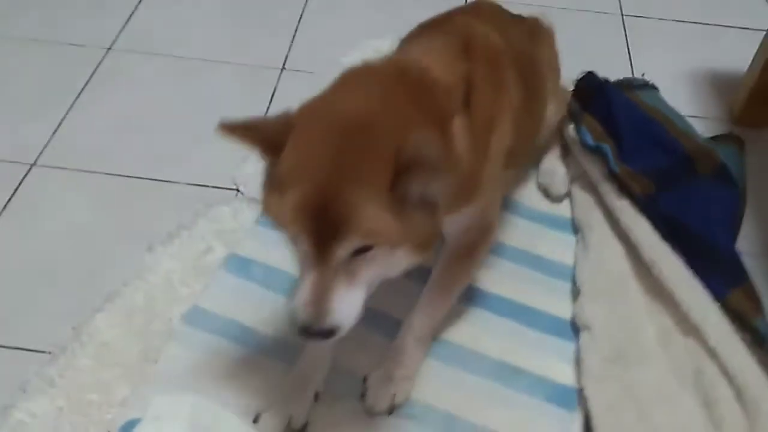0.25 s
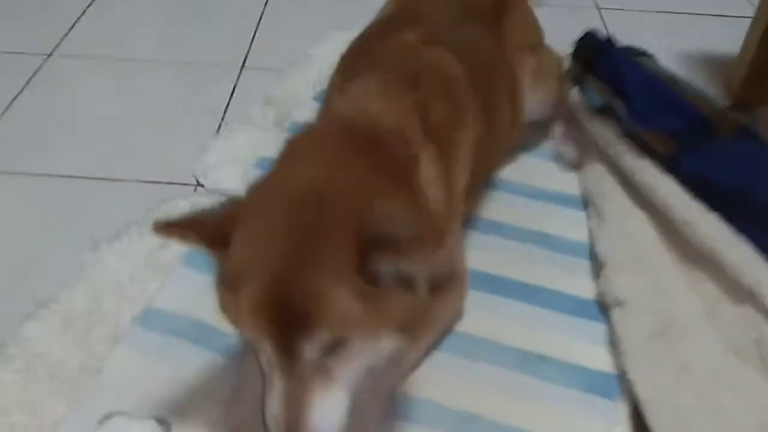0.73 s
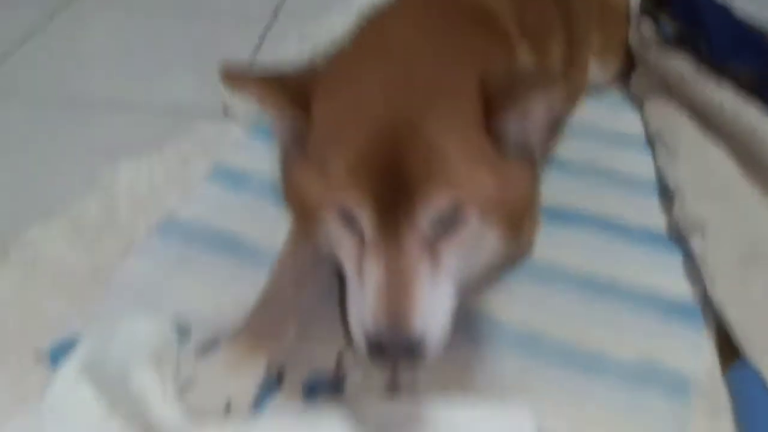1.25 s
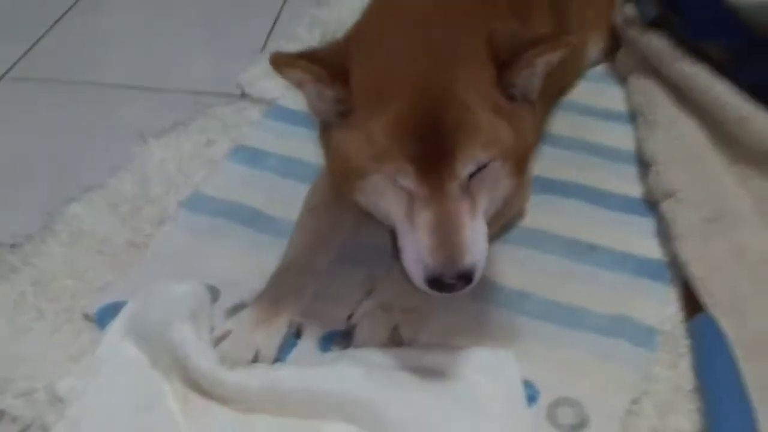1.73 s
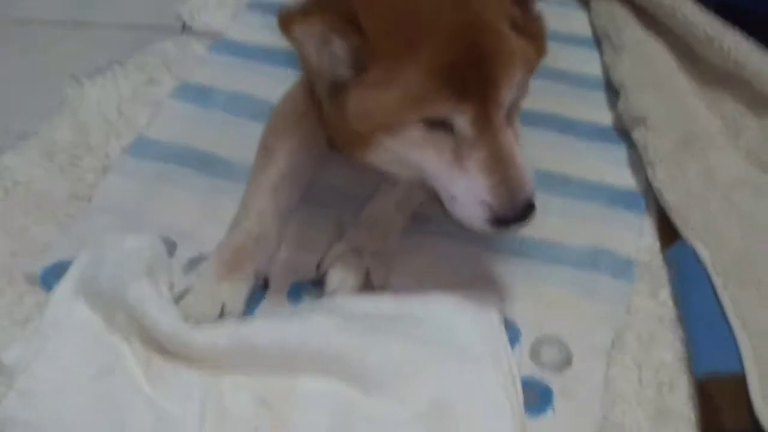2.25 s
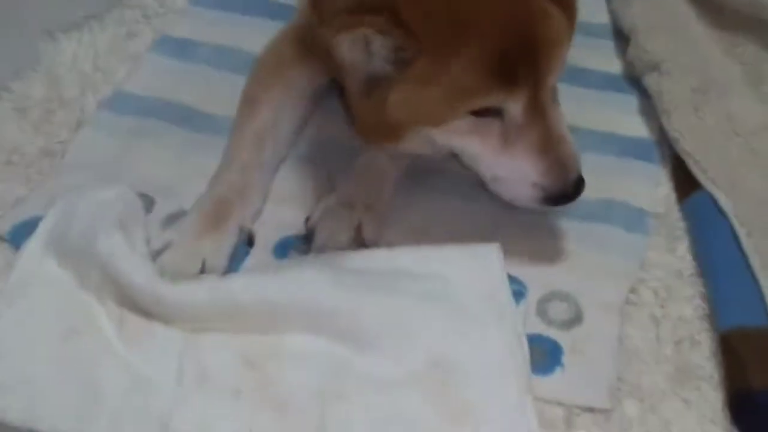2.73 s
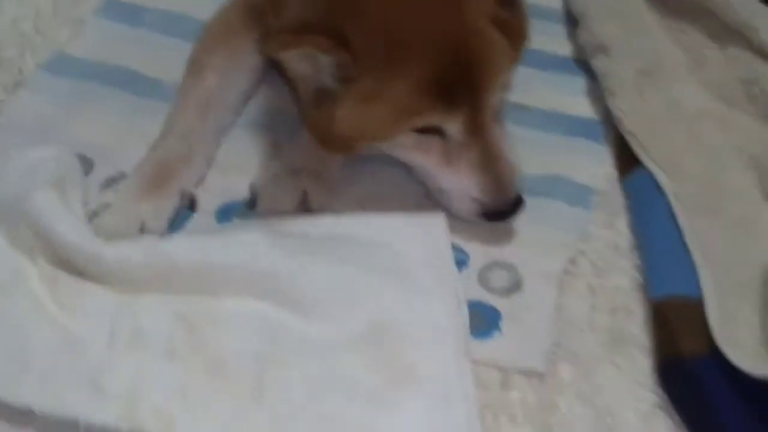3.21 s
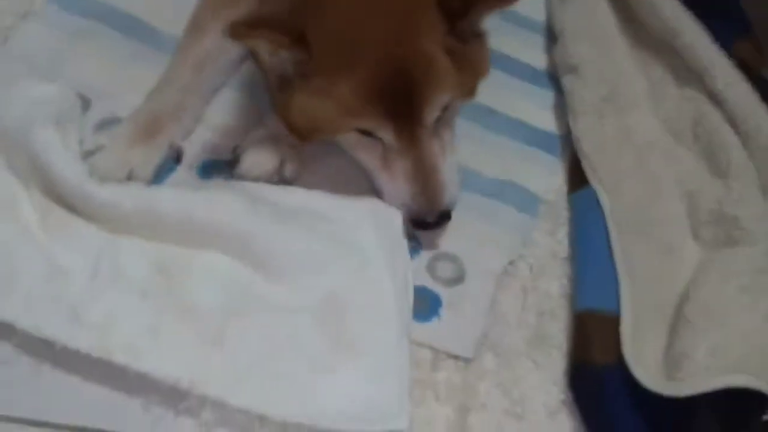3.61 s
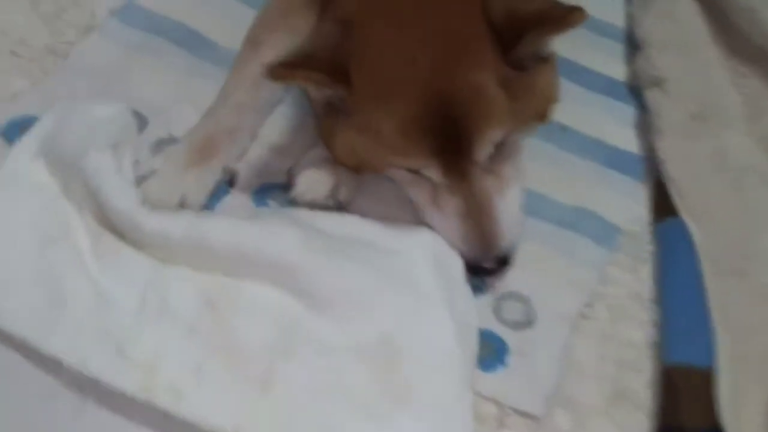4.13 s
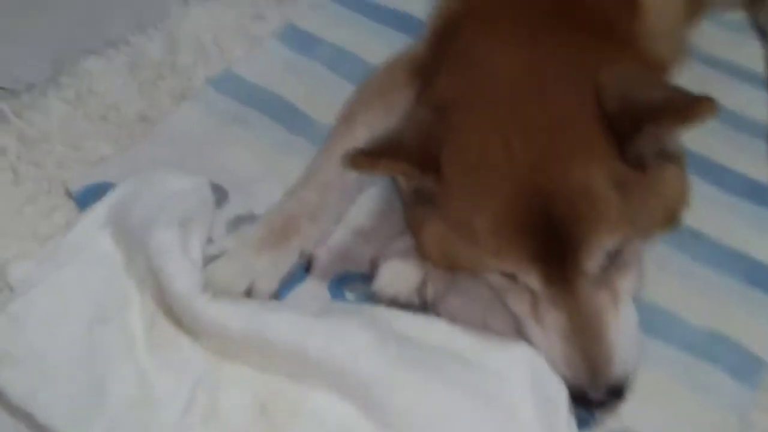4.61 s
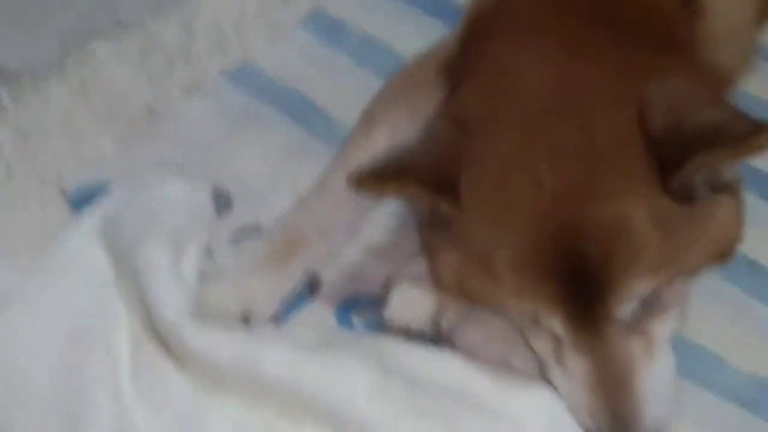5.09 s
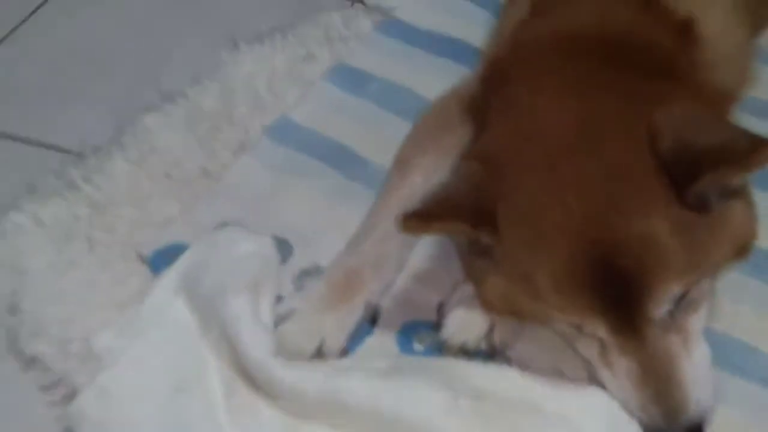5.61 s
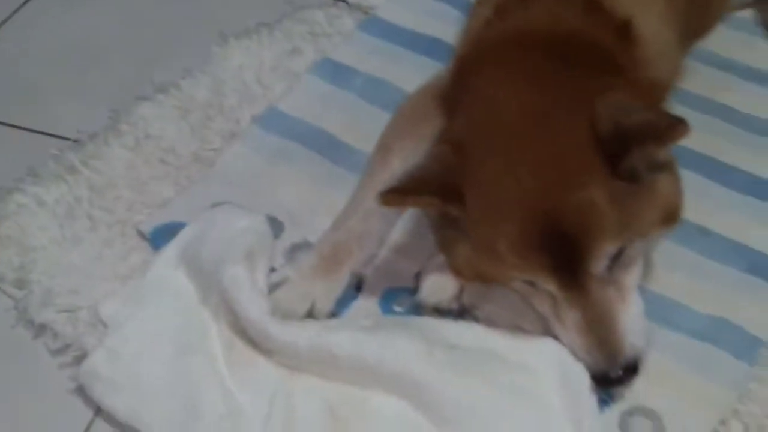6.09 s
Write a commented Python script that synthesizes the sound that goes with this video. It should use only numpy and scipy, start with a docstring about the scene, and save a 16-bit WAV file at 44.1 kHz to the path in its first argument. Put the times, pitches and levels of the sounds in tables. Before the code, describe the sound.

Close, hissy dog sniffs and gentle fabric rustling indoors, dotted with claw and tooth clicks, soft knocks and a single sharp crack.

```python
"""A dog noses at a towel

A dog settles on its bedding in a tiled room, close to a hand-held stereo microphone. Cloth rubs on
cloth, air hisses through the nose and a thin high hiss comes and goes, all made of swelling noise.
Claws and teeth click, the muzzle knocks softly, low bumps reach the microphone body,
and one loud snap rings in the room."""
import sys
import numpy as np
from scipy import signal
from scipy.fft import rfft, irfft
from scipy.io import wavfile

SR = 44100
rng = np.random.default_rng(int(sys.argv[2]) if len(sys.argv) > 2 else 0)


def wav_out(sig):
    """Save sig, one row per channel (or a flat mono array), as 16-bit PCM at SR to the path in sys.argv[1]."""
    wavfile.write(sys.argv[1], SR, np.round(np.clip(np.atleast_2d(sig).T, -1, 1) * 32767).astype(np.int16))


N = 280035

# The tone of the quiet room. Each row: pitch in Hz, relative strength in dB.
ROOM_TONE = [(15, -39), (25, -13), (77, 2.5), (445, -20), (666, -15), (2060, -23), (4150, -21.5),
             (4750, -31.5), (5140, -23), (8350, -24), (11200, -34.5), (14300, -36.5), (15500, -49.5)]
# The dull murmur of pressed bedding. Each row: time in seconds, level in dB.
MURMUR = [(0, -82.5), (1.8, -79.5), (1.95, -89), (2.35, -75.5), (3.17, -79), (3.62, -72.5), (4.06, -79),
          (4.75, -82), (5.9, -79), (6.35, -89.5)]
# Faint rustle between the events. Each row: time in seconds, base level in dB.
RUSTLE_LEVELS = [(0, -73.5), (.1, -76), (.47, -78), (.6, -70), (.8, -75), (1.3, -84), (1.6, -76),
                 (1.9, -101.5), (2.55, -95.5), (2.7, -79), (3.2, -77), (4.0, -81), (4.12, -91.5),
                 (4.85, -86), (5.1, -81.5), (5.9, -79.5), (6.28, -81), (6.35, -98)]

# A swell is a sound that rises, holds and falls. Each row of a swell table begins: start of the hold,
# hold time, time to rise 20 dB and time to fall 20 dB, all in seconds, then level, slide during the
# hold and pan, all in dB. Pan is how much louder the left side is than the right.
# Bedding pressed down hard. Each row: just a swell.
PRESS_SWELLS = [(.39, .01, 0.11, 0.25, -77, 0, -23), (.77, .1, .2, 0.82, -64.5, -7, -1),
                (1.1, .15, 0.06, 0.11, -69.5, 0, -2.5), (1.76, .01, 0.29, 0.077, -67, 0, 3),
                (4.22, 0.0077, 0.056, 0.084, -56, -1.5, -22), (4.6, .04, .1, 0.075, -72.5, 0.5, 0),
                (5.94, 0.0092, .04, 0.057, -60.5, 0, 0.5)]
# Cloth dragged on cloth. Each row: a swell, then dB added for its brighter part.
RUB_SWELLS = [(.36, .01, 0.14, 0.056, -67, -1, -1.5, -6), (.72, .3, 0.06, .1, -71.5, 12, 0, -18),
              (.77, .005, 0.074, 0.037, -58.5, 1, 8, -27), (1.04, 0.0079, 0.092, 0.15, -52.5, -7, -1, 3),
              (1.18, 0.021, 0.033, 0.089, -63.5, 0, 2, -14), (1.645, 0.013, 0.018, .04, -56.5, 2.5, -15, 3),
              (1.67, 0.12, 0.075, 0.12, -64, -4, -1.5, 1.5), (2.25, .005, 0.012, 0.067, -69, -2.5, 8, -10),
              (2.69, 0.37, .08, 0.065, -68.5, 1, -4.5, -6.5), (3.46, .02, 0.1, 0.14, -77, -4, -4, 7.5),
              (3.5, .11, 0.029, 0.062, -61.5, -1.5, 0.5, -10), (3.69, .12, 0.054, 0.087, -63.5, -2, 2, -18),
              (3.95, 0.0095, 0.13, 0.14, -71, 1.5, 0, -14.5), (4.22, .01, .03, 0.04, -50, -1, -12, 1),
              (4.68, .005, 0.018, 0.075, -75.5, 0, -16, -19), (5.07, .005, .2, 0.075, -74, 1.5, 9, -5),
              (5.245, .02, 0.033, 0.072, -65.5, -3, -24, -18),
              (5.425, 0.0054, 0.039, 0.12, -75.5, 4.5, 3.5, -1.5),
              (5.55, .065, 0.024, 0.052, -58, -2.5, -19.5, -14), (5.7, 0.0053, .04, 0.11, -77, 0, 4, -3.5),
              (5.93, 0.0092, 0.026, 0.054, -61, -1.5, -0.5, -20)]
# Broad scuffs close on the right. Each row: a swell, then brightness in dB per band upward.
SCUFF_SWELLS = [(2.3, 0.2, 0.053, .05, -82, -2, -8, -1), (3.04, 0.064, 0.027, 0.031, -51.5, -0.5, -28, 0.5),
                (4.15, 0.066, 0.017, .03, -50.5, -4.5, -23, 0.8),
                (4.3, 0.032, 0.083, 0.058, -48.5, 3.5, -31, 0),
                (4.355, 0.018, 0.034, 0.041, -44.5, 0.5, -39, 0),
                (4.4, .26, 0.022, .05, -55.5, -7.5, -18.5, 0.85),
                (5.13, 0.014, 0.17, 0.053, -65, -2.5, -15, -0.6)]
# Thin high hiss, mostly left. Each row: a swell, then dB added in the TOP band and in the NOSE band.
HISS_SWELLS = [(0., .36, .05, 0.056, -55.5, 0, 7, -12, -3.5),
               (.9, 0.24, 0.066, 0.083, -59, -6, 30, -15, -8),
               (1.4, 0.41, 0.028, 0.063, -59, 5.5, 16, -2, 1.5),
               (1.62, 0.21, .1, .05, -56, -7, -5.5, -9, -10),
               (2.245, .005, .01, 0.053, -81.5, 3, 4, 1.5, 4),
               (2.64, 0.36, 0.033, .08, -62, -6.5, 10, 2, 7.5),
               (3.3, 0.67, 0.21, 0.11, -56.5, 1.5, 1, 3, -19),
               (4.22, 0.051, 0.042, 0.077, -57.5, -3, -2, 0.5, 10),
               (4.468, .01, .004, 0.13, -63, -7, 17, 0, 8), (5.415, 0.022, .01, 0.075, -72, -2, 10, -1, -5),
               (5.58, 0.67, 0.097, 0.056, -50, -6, 20, -20, -18)]
# The rasp of a strong sniff. Each row: a swell, then dB added for its lower part.
RASP_SWELLS = [(.15, 0.06, .04, 0.094, -45.5, 2, -4, -3), (1.025, 0.0074, 0.053, 0.14, -52, -1.5, 1, -2),
               (1.65, 0.17, 0.059, 0.058, -58.5, -4.5, 0, -1.5),
               (3.315, .14, 0.076, .05, -57.5, 1, 7, -15.5), (3.465, 0.0082, .03, 0.1, -58, -8.5, 2, 6),
               (3.74, .01, 0.07, 0.096, -60, -5, 3, -4.5), (4.23, 0.024, 0.068, 0.069, -55, 3, -6, -5),
               (6.2, .05, 0.42, 0.069, -64.5, -2.5, 6, -28)]
# Air through the nose; the swell at 0.65 s is the snap's hissy tail.
# Each row: a swell, then dB added in the TOP band.
AIRY_SWELLS = [(.155, 0.2, 0.051, 0.064, -38, -10.5, -1, -9.5),
               (.65, 0.083, 0.037, 0.091, -48.5, -3.5, -2.5, -19),
               (.94, .15, 0.14, 0.13, -46.5, 4, -0.5, -12.5), (1.65, 0.15, 0.18, 0.066, -44, -3, 4, -16),
               (2.68, 0.4, .05, 0.059, -62.5, -8, 8, 2), (3.3, 0.2, 0.12, 0.13, -45, -2.5, -1, -10),
               (3.745, 0.021, 0.055, 0.077, -45, -2.5, 1.5, -3), (5.55, 0.28, 0.15, .1, -66, -4, -10.5, -4),
               (5.93, 0.32, 0.53, 0.065, -54, 0.5, 0.5, -18)]

# Seven bands of noise (ranges of pitch), from 400 Hz upward.
DULL_CLOTH, BRIGHT_CLOTH, LOW_RASP, HIGH_RASP, NOSE_BAND, TOP_BAND, HISS_BAND = range(7)
TOP_START_HZ, HISS_START_HZ, HISS_END_HZ = 9500, 11900, 15700
# The tone of the scuffs. Each entry: dB added in one of the seven bands.
SCUFF_BAND_DB = [-4.5, -3.5, -6.5, -4.5, 1.5, -12.5, -20.5]
# The tone of the rustle. Each entry: dB added in one of the seven bands.
RUSTLE_BAND_DB = [-4, -6, -3.5, 0.5, 8, -2.5, -8.5]
# Pitches that the nasal passages favour. Each row: pitch in Hz, width in Hz, relative strength in dB.
NASAL_PEAKS = [(6182, 2100, -2), (7220, 1100, 4), (8510, 1500, 0.5)]

# Low bumps on the microphone. Each row: start in seconds, peak in dB, pitch in Hz, pan in dB,
# rough length in seconds.
MIC_BUMPS = [(0.337, -53.5, 75.4, -16, 0.038), (0.654, -48, 73.4, 4, 0.033),
             (0.836, -56.5, 70.0, -1, 0.037), (1.081, -49, 57.3, 3, 0.031), (1.129, -54, 78.1, 2.5, 0.028),
             (1.584, -56, 74.6, 4, 0.038), (1.836, -62, 72, 9.5, 0.036), (2.043, -58, 80.7, 8, 0.033),
             (2.311, -51, 69.8, 8, 0.042), (2.389, -48, 75, 4.5, 0.055), (2.681, -59.5, 76, -16, 0.05),
             (2.906, -56.5, 87.5, 5, 0.05), (3.023, -52.5, 84, 7, 0.055), (3.116, -55, 72.5, 14, 0.052),
             (4.197, -45.5, 86, -35, 0.043), (4.595, -51.5, 87, 7.5, 0.042),
             (4.626, -55, 61.9, -6.5, 0.038), (5.285, -59, 78.1, 3.5, 0.032), (6.213, -60, 61.9, 12, 0.044)]
# Soft hollow knocks of the muzzle. Each row reads like a row of the bumps.
MUZZLE_KNOCKS = [(0.407, -42, 164, -26.5, 0.018), (0.766, -41.5, 493, -2, 0.0096),
                 (0.86, -52.5, 272, -2, 0.025), (1.177, -45.5, 515, 5, 0.049), (1.734, -49.5, 530, 3, 0.02),
                 (2.249, -57, 242, 7, 0.02), (2.475, -66, 151, 9, 0.015), (3.511, -58, 899, -6, 0.013),
                 (3.501, -47.5, 620, -1.5, 0.01), (3.521, -44.5, 630, -7, 0.011),
                 (3.584, -52, 720, -6, 0.032), (3.607, -45.5, 596, -4, 0.012),
                 (3.7, -55.5, 693, -1.5, 0.022), (3.944, -59, 586, 1, 0.019), (4.207, -31, 182, -32, 0.011),
                 (4.575, -55, 125, 5, 0.035), (4.63, -54, 120, 0, 0.028), (4.679, -52, 441, -19, 0.016),
                 (5.072, -50.5, 378, 4, 0.012), (5.562, -56.5, 423, -21, 0.017),
                 (5.604, -58, 466, -9, 0.023), (5.705, -47, 375, 9.5, 0.0095), (5.93, -57, 310, -6, 0.012),
                 (5.94, -56, 360, -5, 0.022)]
# Claws and teeth. Each row: start in seconds, peak of the bright part in dB, its centre in Hz,
# pan in dB, dB added for the dull part.
CLAW_TOOTH_CLICKS = [(.147, -37.5, 3900, -3, -33), (.7294, -59.5, 6100, -1.5, -11),
                     (1.384, -53, 8420, 14, -27), (1.45, -48.5, 8450, 18, -34.5),
                     (1.647, -36.5, 2290, -24, -0.5), (2.246, -53, 4490, 12, -1.5),
                     (2.9446, -31.5, 8550, -22, -16), (4.4431, -35, 4000, -16, -15),
                     (4.4666, -34, 8500, 14, -31), (4.7485, -44.5, 9500, -16, -33),
                     (5.072, -49.5, 3790, 15, -14), (5.4176, -51.5, 13400, -3.5, -24),
                     (5.5574, -44, 13600, 11, -22.5)]
# The snap's ringing tones. Each row: pitch in Hz, relative strength in dB, seconds to fade by 60 dB.
SNAP_TONES = [(1285.3, -20.5, .006), (1900, -16.5, 0.0094), (2510, -6.5, .006), (3590, 1.5, 0.008),
              (4360, -3, 0.0032), (5400, -5.5, 0.0047), (7220, -12, .005), (9000, -19.5, .004)]

STEP = 40   # samples between the points of a slow loudness curve
CURVE_TIMES = np.arange(0, N, STEP) / SR


def from_db(db):
    """Turn decibels into a gain, a number to multiply a sound by."""
    return 10 ** (np.asarray(db) / 20)


def rms_one(x):
    """Scale a sound so that its average size (rms) is 1."""
    return x / np.sqrt(np.mean(x ** 2) + 1e-20)


def panned(pan_db):
    """Left and right gains that keep the total power the same."""
    left = from_db(pan_db)
    return np.array([left, np.ones_like(left)]) * np.sqrt(2 / (1 + left ** 2))


def band(x, low_hz, high_hz, order=4):
    """Keep the part of a sound between two pitches."""
    return signal.sosfilt(signal.butter(order, [low_hz, high_hz], "band", fs=SR, output="sos"), x)


def stretch(curves):
    """Fill in slow curves so that they have a value at every sample."""
    return np.array([np.interp(np.arange(N) / STEP, np.arange(len(c)), c) for c in curves])


def drift(rate_hz):
    """A smooth random wander for each side, about 1 in size."""
    r = np.exp(-2 * np.pi * STEP * rate_hz / SR)
    chance = rng.standard_normal((2, N // STEP + 2002))
    slow = signal.lfilter([1], [1, -2 * r, r * r], chance)[:, 2000:]   # skip the settling time
    return stretch([rms_one(side) for side in slow])


def noise(alike=0., grain_db=0.):
    """Stereo noise. alike (0 to 1) makes the sides match; grain makes it rough, like fibres catching."""
    white = rng.standard_normal((2, N))
    shared, apart = white * from_db(grain_db * np.minimum(rng.exponential(1, (2, N)), 5))
    return np.sqrt(1 + alike) * shared + np.sqrt(1 - alike) * apart * [[1], [-1]]


def patchy(x, low_hz, high_hz, flicker_db, slices):
    """Cut a range of pitch into slices that each flicker on their own; the result has rms 1."""
    edges = np.geomspace(low_hz, high_hz, slices + 1)
    out = 0
    for k, (low, high) in enumerate(zip(edges, edges[1:])):
        shifted = np.roll(x, 97 * (k % 2), axis=1)   # keeps neighbouring slices unrelated
        out = out + band(shifted, low, high, order=3) * from_db(flicker_db * drift(9.1))
    return rms_one(out)


def level_curve(rows):
    """Join points of time and level into a slow curve of power."""
    return from_db(np.interp(CURVE_TIMES, *np.transpose(rows))) ** 2


def swells(rows, add_column=None):
    """Left and right power of a table's swells. add_column (counted from 0) holds extra dB."""
    columns = np.array(rows).T[:, :, None]
    start, hold, rise, fall, db, slide, pan = columns[:7]
    if add_column is not None:
        db = db + columns[add_column]
    t = CURVE_TIMES - start
    fade = np.maximum(-t / rise, 0) + np.maximum((t - hold) / fall, 0)
    db = db + slide * np.clip(t / hold, 0, 1) - 20 * np.minimum(fade, 10)
    return ((panned(pan) * from_db(db)) ** 2).sum(axis=1)


def band_gain(own_power, which):
    """The loudness of one of the seven bands: its own swells plus the scuffs and the faint rustle."""
    scuffs = np.array(SCUFF_SWELLS)
    tilt_db = (which - HIGH_RASP) * scuffs[:, 7]
    scuffs[:, 4] += SCUFF_BAND_DB[which] + tilt_db   # column 4 is the level
    rustle = level_curve(RUSTLE_LEVELS) * from_db(RUSTLE_BAND_DB[which]) ** 2
    return stretch(np.sqrt(own_power + swells(scuffs) + rustle))


def ring(hits, hz, fade_s):
    """Each hit starts a pure tone that fades by 60 dB in fade_s seconds."""
    r, turn = from_db(-60 / (fade_s * SR)), 2 * np.pi * hz / SR
    return signal.lfilter([0, np.sin(turn)], [1, -2 * r * np.cos(turn), r * r], hits + 1e-18)


def room_tone(level_db=-75.5):
    """The quiet room wavers slowly; its two sides match only in the bass."""
    hz = np.maximum(np.arange(N // 2 + 1) * SR / N, 1)
    pitches, strengths = np.transpose(ROOM_TONE)
    shape = from_db(np.interp(np.log(hz), np.log(pitches), strengths))
    alike = 0.99 / (1 + hz / 600)
    shared, apart = rng.standard_normal((2, N))
    shared = irfft(rfft(shared) * shape * np.sqrt(1 + alike), N)
    apart = irfft(rfft(apart) * shape * np.sqrt(1 - alike), N)
    return from_db(level_db + 1.5 * drift(3.7)) * rms_one(shared + apart * [[1], [-1]])


def hand_rumble(level_db=-75.0):
    """A trembling hand makes the microphone body rumble, low and lumpy."""
    lumps = noise(alike=.75) * from_db(6.7 * drift(12.0)[0])
    return from_db(level_db) * rms_one(band(lumps, 50, 110, order=2))


def padded_contacts(rows, rise):
    """Soft knocks or bumps: a short tone swells and dies. rise is the share of its length spent growing."""
    out = np.zeros((2, N))
    for start, peak_db, hz, pan_db, length in rows:
        progress = np.arange(round(3 * length * SR)) / (length * SR)
        swell = (progress / rise) ** 2 * np.exp(2 - 2 * progress / rise)
        wave = swell * np.sin(2 * np.pi * (hz * length * progress + rng.random()))
        at = round(start * SR)
        out[:, at:at + len(wave)] += from_db(peak_db) * panned(pan_db)[:, None] * wave[:N - at]
    return out


def bedding():
    """Soft bedding gives a lumpy low noise as it is pressed down."""
    loudness = stretch(np.sqrt(swells(PRESS_SWELLS) + level_curve(MURMUR)))
    lumps = from_db(2.7 * drift(25.0)[0])
    return loudness * lumps * patchy(noise(alike=.6), 130, 400, flicker_db=2.5, slices=3)


def cloth_rub():
    """Fibres catch on each other: grainy noise with a dull part and a brighter part."""
    fibres = noise(alike=0.11, grain_db=3.5) * from_db(2.0 * drift(37.0)[0])
    muffled = signal.lfilter([1], [1, -.93], fibres)   # thick cloth favours the low end
    dull = patchy(muffled, 400, 1300, flicker_db=4.0, slices=5)
    bright = patchy(fibres, 1300, 2350, flicker_db=3.4, slices=4)
    dull *= band_gain(swells(RUB_SWELLS), DULL_CLOTH)
    bright *= band_gain(swells(RUB_SWELLS, add_column=7), BRIGHT_CLOTH)
    return dull + bright


def thin_hiss():
    """A smooth hiss comes and goes near the top of hearing."""
    hiss = patchy(noise(), HISS_START_HZ, HISS_END_HZ, flicker_db=3.5, slices=8)
    return hiss * band_gain(swells(HISS_SWELLS), HISS_BAND)


def nostril_rasp():
    """Air makes a gritty noise at the nostrils."""
    grit = noise(alike=0.03, grain_db=1.0) * from_db(2.0 * drift(40.0)[0])
    upper = patchy(grit, 3500, 4900, flicker_db=4.2, slices=5)
    lower = patchy(grit, 2380, 3500, flicker_db=3.2, slices=4)
    upper *= band_gain(swells(RASP_SWELLS), HIGH_RASP)
    lower *= band_gain(swells(RASP_SWELLS, add_column=7), LOW_RASP)
    return upper + lower


def sniffing():
    """Air swirls in narrow nasal passages. The same noise serves the thin hiss and the snap's tail."""
    air, nasal = noise(), 0
    for k, (hz, width_hz, db) in enumerate(NASAL_PEAKS):
        r = np.exp(-np.pi * width_hz / SR)
        feedback = [1, -2 * r * np.cos(2 * np.pi * hz / SR), r * r]
        peak = signal.lfilter([1 - r * r, 0, r * r - 1], feedback, air)
        nasal = nasal + (-1) ** k * from_db(db) * peak
    jet = patchy(nasal, 4900, TOP_START_HZ, flicker_db=3.7, slices=12)
    top = patchy(air, TOP_START_HZ, HISS_START_HZ, flicker_db=2.5, slices=6)
    jet *= band_gain(swells(AIRY_SWELLS) + swells(HISS_SWELLS, add_column=8), NOSE_BAND)
    top *= band_gain(swells(AIRY_SWELLS, add_column=7) + swells(HISS_SWELLS, add_column=7), TOP_BAND)
    return jet + top


def claws_and_teeth(bright_fade_s=0.012, dull_fade_s=0.0071, spread=1.8):
    """Each click is a bright burst of noise over a duller one, both gone in milliseconds."""
    out, t = np.zeros((2, N)), np.arange(600) / SR
    for start, peak_db, hz, pan_db, dull_db in CLAW_TOOTH_CLICKS:
        bright, dull = rng.standard_normal((2, len(t)))
        bright *= from_db(-60 * t / bright_fade_s)
        bright = band(bright, hz / spread, min(hz * spread, HISS_END_HZ), order=3)
        dull = band(dull * from_db(-60 * t / dull_fade_s), 390, 1500, order=1)
        click = bright / np.abs(bright).max() + from_db(dull_db) * dull / np.abs(dull).max()
        at = round(start * SR)
        out[:, at:at + len(t)] += from_db(peak_db) * panned(pan_db)[:, None] * click
    return out


def snap(start_s=.6171, echo_delay_s=0.0096, echo_fade_s=0.19):
    """One hard crack with a quick second contact; the walls answer with a dying wash of sound."""
    hit, at = np.zeros(N), round(start_s * SR)
    for delay_s, strength in (0, -.4), (.0003, 1), (.0029, .15):
        hit[at + round(delay_s * SR)] = strength
    hit = signal.sosfilt(signal.butter(2, 9000, fs=SR, output="sos"), hit)   # contact is not quite instant
    tones = [(-1) ** k * from_db(db) * ring(hit, hz, fade) for k, (hz, db, fade) in enumerate(SNAP_TONES)]
    direct = from_db(-5.5) * sum(tones)
    t = np.arange(SR // 2) / SR
    wash = rng.standard_normal((2, len(t))) * from_db(-35.5 - 60 * t / echo_fade_s)
    wash *= np.clip((t - echo_delay_s) / .004, .25, 1)   # weak until the walls answer
    echo = signal.fftconvolve(direct[None, at:at + 1000], wash, axes=1)
    room = np.zeros((2, N))
    room[:, at:at + echo.shape[1]] = echo
    return panned(-11)[:, None] * direct + panned(-1.7)[:, None] * room


def scene():
    """Add up the dog, its bedding, the snap and the background."""
    rustling = cloth_rub() + nostril_rasp() + sniffing() + thin_hiss() + bedding()
    clicks = claws_and_teeth()
    knocks = padded_contacts(MUZZLE_KNOCKS, rise=0.2)
    bumps = padded_contacts(MIC_BUMPS, rise=0.4)
    return rustling + clicks + knocks + bumps + snap() + room_tone() + hand_rumble()


def record(dry):
    """Cut away the treble above 16500 Hz and keep the samples between -1 and 1."""
    treble_cut = signal.cheby2(14, 70, 16500, fs=SR, output="sos")
    return np.clip(signal.sosfilt(treble_cut, dry), -1, 1)


dry = scene()
out = record(dry)
wav_out(out)
```